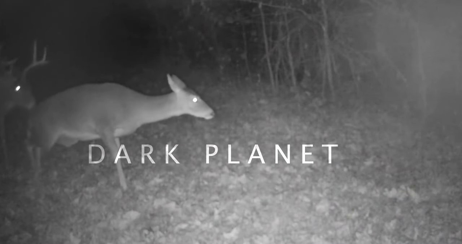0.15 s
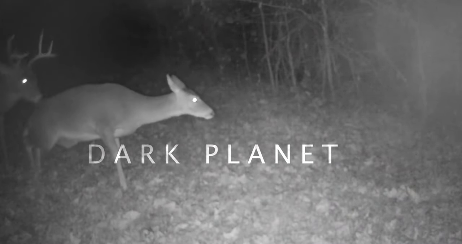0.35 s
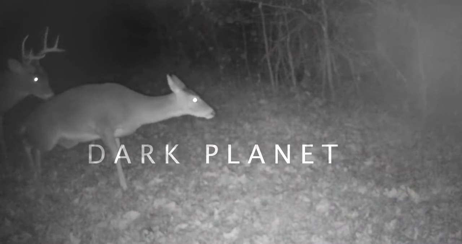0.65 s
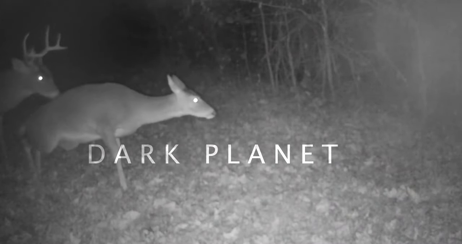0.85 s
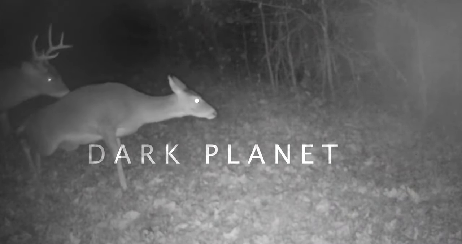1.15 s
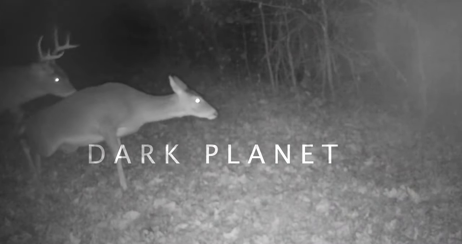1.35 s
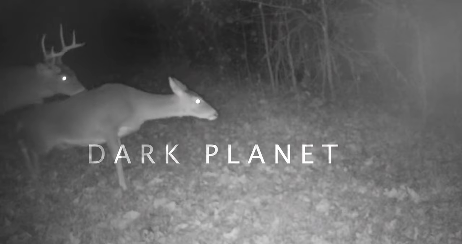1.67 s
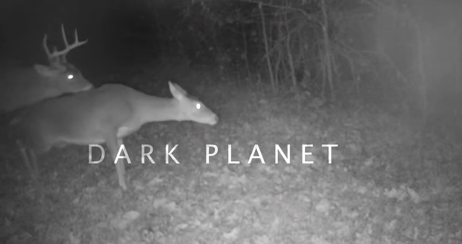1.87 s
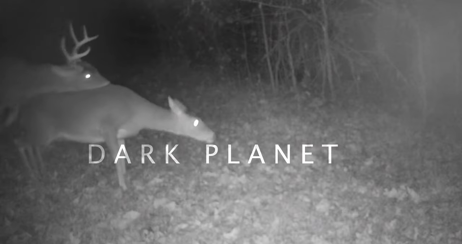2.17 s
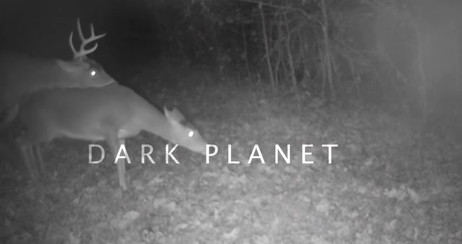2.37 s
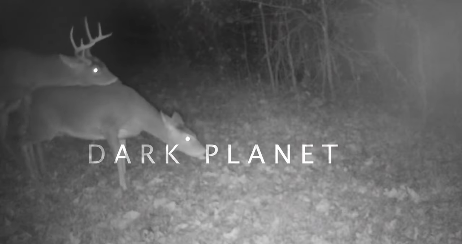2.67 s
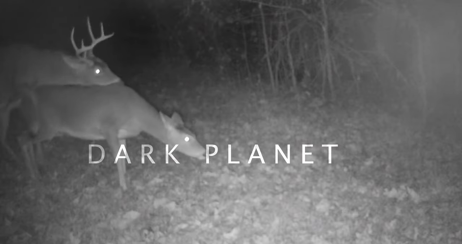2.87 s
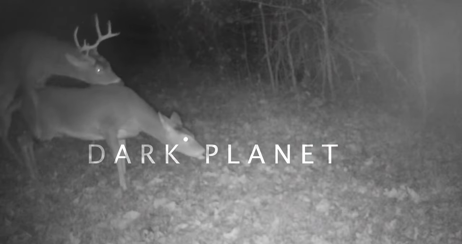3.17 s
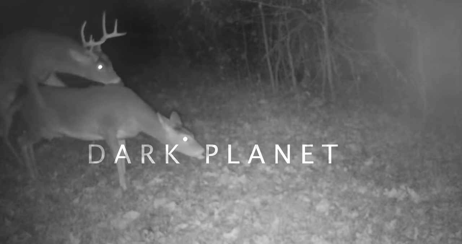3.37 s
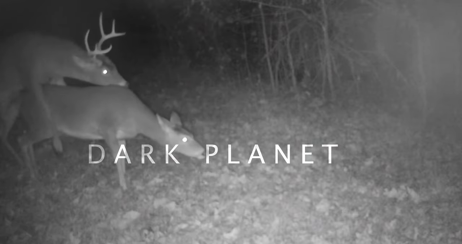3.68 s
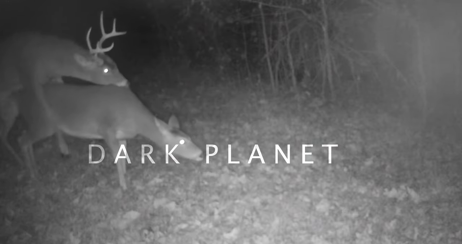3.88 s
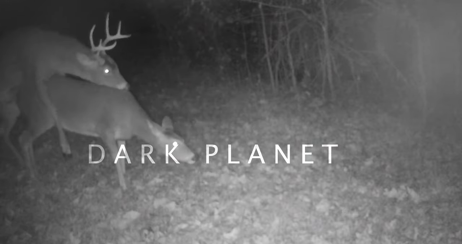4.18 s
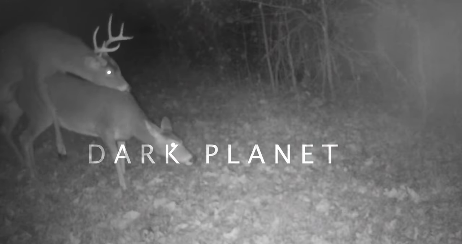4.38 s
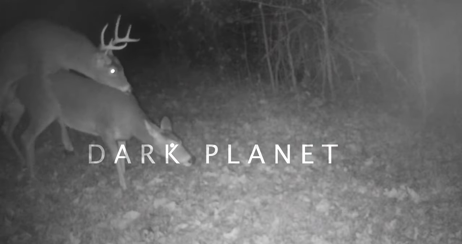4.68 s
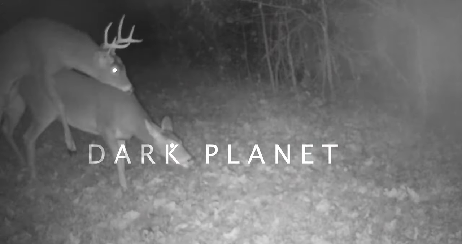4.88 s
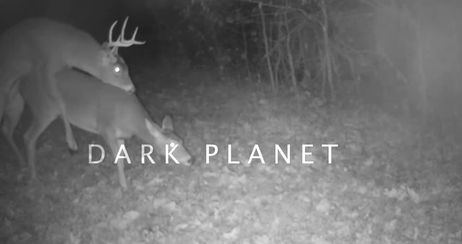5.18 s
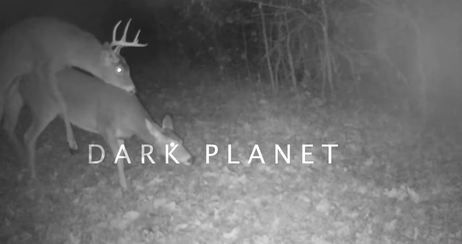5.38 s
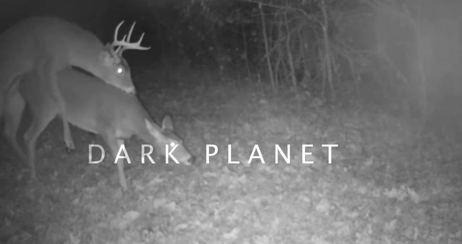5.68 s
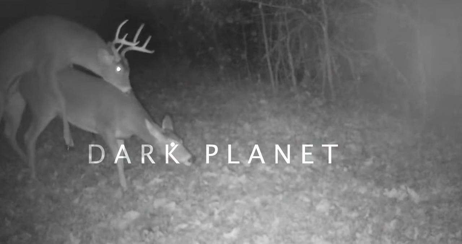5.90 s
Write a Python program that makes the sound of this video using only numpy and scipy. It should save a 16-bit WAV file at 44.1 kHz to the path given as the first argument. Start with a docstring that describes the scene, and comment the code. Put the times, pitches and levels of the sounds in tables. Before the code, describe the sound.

Two deer move through dry leaf litter in woods at night, a few metres from a small mono microphone. A crisp scuffle with several sharp stalk snaps fills the first 0.3 seconds, followed by softer, uneven rustling and small ticks. At about 2 seconds a hoof crunches down with a light thud and a snap, with a very faint, brief rising low note beneath it. Shuffling continues, with more snaps and another step between 2.6 and 2.9 seconds. From 3.3 seconds a dragging rustle swells into the loudest crunch and thud at 3.6, trailed by quick snaps. From 4 to 5.4 seconds there are only slight stirs and tiny cracks. A final scuffle with two steps follows, ending in a sharp snap at 5.8. The echo is short and weak. Faint hiss, low rumble and a thin, steady high electronic whine run throughout.

```python
"""Two deer shuffle through dry leaf litter at night, a few metres from a trail camera.
Dragged legs crackle the leaves, hooves crush them and thud, and stalks and twigs snap.
A faint low note rises under one footfall; trunks and ground return a short echo.
The camera's small housing rings near 4.5 kHz (the peak in the leaf spectra and stalk pitches);
its electronics add hiss, rumble and a thin whine."""
import sys
import numpy as np
from scipy import signal
from scipy.fft import rfft, irfft
from scipy.io import wavfile
from scipy.ndimage import uniform_filter1d, map_coordinates

SR = 44100
rng = np.random.default_rng(int(sys.argv[2]) if len(sys.argv) > 2 else 0)


def pcm_store(signal):
    """Save signal as 16-bit PCM."""
    levels = np.round(np.clip(np.atleast_2d(signal), -1, 1) * 32767)
    wavfile.write(sys.argv[1], SR, levels.astype(np.int16).T)


N = 266570
BAND_HZ, OUTPUT_HZ = 10250, 16000


def amp(db):
    """Decibels to gain."""
    return 10 ** (np.asarray(db) / 20)


def unit(x):
    """Scale to rms 1."""
    return x / np.sqrt(np.mean(x ** 2) + 1e-20)


def add(track, start_s, sound):
    """Mix a sound into the track."""
    part = track[max(round(start_s * SR), 0):][:len(sound)]
    part += sound[:len(part)]


def wobble(rate_hz):
    """Smooth curve through random knots."""
    knots = rng.standard_normal(int(N * rate_hz / SR) + 4)
    return map_coordinates(knots, [np.arange(N) * rate_hz / SR])


def resonate(x, hz, q):
    """Two-pole resonance."""
    return signal.lfilter(*signal.iirpeak(min(hz, BAND_HZ), max(q, .5), fs=SR), x)


def low_pass(x, hz):
    """Steep FIR low-pass."""
    return signal.fftconvolve(x, signal.firwin(401, hz, fs=SR), "same")


def coloured(x, spectrum, size=8192):
    """Minimum-phase filter through (freq_hz, gain_db) points."""
    freq_hz, gain_db = np.transpose(spectrum)
    bins_hz = np.fft.rfftfreq(size, 1 / SR)
    gain = amp(np.interp(np.log(bins_hz + 1), np.log(freq_hz), gain_db))
    cepstrum = irfft(np.log(gain))
    cepstrum[1:size // 2] *= 2
    cepstrum[size // 2 + 1:] = 0
    impulse = irfft(np.exp(rfft(cepstrum)))
    return signal.fftconvolve(x, impulse)[:len(x)]


# Camera noise floor: freq_hz, gain_db
HISS_SPECTRUM = [(15, -11), (36, 6), (60, -3.5), (120, -1), (180, -8.5), (400, -12.5), (800, -14.5),
                 (1500, -18), (3000, -20), (4500, -23.5), (6500, -23.5), (10000, -24)]


def electronics():
    """The camera's own hiss and rumble, with a steady thin whine."""
    hiss_db, whine_db, whine_hz = -36.5, -42.5, 5223.4
    hiss = amp(hiss_db) * unit(coloured(rng.standard_normal(N), HISS_SPECTRUM))
    phase = 2 * np.pi * np.cumsum(whine_hz + .66 * wobble(rate_hz=3.87)) / SR
    whine = amp(whine_db + .3 * wobble(rate_hz=7.4)) * unit(np.sin(phase))
    return hiss + whine


def woods(x, t60_s=.14, echo_db=-15.5):
    """Trunks and ground scatter a short, weak echo."""
    t = np.arange(SR // 2) / SR
    tail = rng.standard_normal(len(t)) * amp(-60 * t / t60_s)
    return x + amp(echo_db) * signal.fftconvolve(x, tail / np.linalg.norm(tail))[:N]


def low_note():
    """A faint low note swells, rises and fades; perhaps a deer's soft call."""
    start_s, length_s, level_db = 1.98, .145, -46.5
    pitch_hz, rise_hz_per_s = 241, 265
    t, out = np.arange(int(length_s * SR)) / SR, np.zeros(N)
    phase = 2 * np.pi * np.cumsum(pitch_hz + rise_hz_per_s * t) / SR
    swell = np.sin(np.pi * t / length_s)
    add(out, start_s, amp(level_db) * unit(swell * np.sin(phase)))
    return out


def snap(pitch_hz, q, crack_share, splinter, t60_s, tear_s, echo_s):
    """One break: fibres tear, splinter on and reflect, giving a broad crack and a ring."""
    t = np.arange(SR // 20) / SR
    envelope = np.exp(-t / tear_s) + splinter * amp(-60 * t / t60_s)
    force = rng.standard_normal(len(t)) * envelope
    delay = int(echo_s * SR * amp(rng.normal(0, 2)))
    force = force + .29 * np.pad(force, (delay, 0))[:len(t)]
    crack = resonate(force, pitch_hz, q=1)
    ring = resonate(resonate(crack, pitch_hz, q), pitch_hz, q)
    band_limit = signal.butter(6, .95 * BAND_HZ, fs=SR, output="sos")
    sound = signal.sosfilt(band_limit, ring + crack_share * crack)
    return sound / np.sqrt(np.sum(sound ** 2) / (.002 * SR))  # energy of 2 ms at rms 1


# Leaf stalks breaking: start_s, level_db, pitch_hz, crack_share
STALK_SNAPS = [(0.054, -16.5, 3500, 0.41), (0.0794, -6, 4900, 0.77), (0.129, -14.0, 3660, 0.4),
               (0.2002, -12, 4400, 0.45), (0.2286, -11.5, 4500, 0.3), (0.3826, -23, 4105, 0.53),
               (0.7762, -30, 3913, 0.2), (0.9785, -17, 4543, 0.34), (1.059, -19.5, 4170, 0.15),
               (1.87, -25, 4150, 0.54), (2.0702, -9, 4840, 1.2), (2.6034, -9, 4380, 0.29),
               (3.428, -12, 4398, 0.65), (3.543, -8.5, 4394, 0.15), (3.773, -13.5, 4333, 1.16),
               (3.8082, -19, 4095, 0.32), (3.8517, -20.5, 4163, 0.72), (3.8948, -16.5, 4170, 1.2),
               (4.374, -27, 4920, 0.82), (4.412, -29, 3780, 0.27), (5.085, -31, 4460, 0.24),
               (5.1535, -28, 4370, 0.22), (5.825, -12, 4594, 0.59)]
# Twigs cracking under the litter: start_s, level_db, pitch_hz, q
TWIG_CRACKS = [(0.4417, -20, 2600, 0.5), (0.533, -29.5, 2000, .55), (1.828, -27.5, 1500, .55),
               (2.605, -27, 1498, .6), (2.8137, -20, 2800, .7), (2.861, -19, 1450, .55),
               (4.062, -30, 2600, .55), (4.278, -32.5, 800, .55), (4.749, -32.5, 2970, .7),
               (5.825, -14.5, 2700, 3)]


def breaks(onset_delay_s=.0008):
    """Stalks snap brightly; buried twigs give a lower, broader crack."""
    out = np.zeros(N)
    for start_s, level_db, pitch_hz, crack_share in STALK_SNAPS:
        stalk = snap(pitch_hz, q=2, crack_share=crack_share, splinter=.27,
                     t60_s=.029, tear_s=.00045, echo_s=.00118)
        add(out, start_s + onset_delay_s, amp(level_db) * stalk)
    for start_s, level_db, pitch_hz, q in TWIG_CRACKS:
        twig = snap(pitch_hz, q, crack_share=1.9, splinter=.19, t60_s=.028, tear_s=.00043, echo_s=.00134)
        add(out, start_s + onset_delay_s, amp(level_db) * twig)
    return out


def crackle(spectrum, rate_per_s, spread_db, clump_db, clump_hz):
    """Tiny leaf fractures at random moments: many weak, few strong, in clumps."""
    per_sample = rate_per_s / SR
    clicks = np.sqrt(rng.poisson(per_sample, N) / per_sample) * rng.choice([-1, 1], N)
    clicks *= amp(spread_db * np.clip(rng.standard_normal(N), -2, 2))
    clumps = amp(clump_db * wobble(clump_hz))
    return unit(coloured(clicks * clumps, spectrum))


# Leaves crushed underfoot: freq_hz, gain_db
CRUSH_SPECTRUM = [(80, -31), (260, -15.5), (700, -12.5), (1100, -12.5), (1800, -3.5), (2600, -7), (3900, 2),
                  (4800, -1.5), (6500, -8.5), (9800, -15), (12000, -38)]
# Hooves taking weight: peak_s, crunch_db, rise_s, hold_s, t60_s, thud_db, thud_hz
FOOTFALLS = [(0.095, -25, 0.0072, 0.036, 0.12, -35.5, 1100), (2.021, -25, 0.0024, 0.013, 0.14, -22, 1900),
             (2.045, -18.5, 0.003, 0.032, 0.057, -32, 1500), (2.706, -20.5, .0015, 0.018, 0.043, -28, 1120),
             (3.62, -8, 0.01, 0.0049, 0.13, -18, 919.8), (3.689, -16, .004, 0.0079, 0.044, -26.5, 497),
             (5.652, -27, 0.0055, 0.017, .05, -24.5, 1799), (5.733, -18, 0.0049, .02, 0.077, -34, 1500)]


def hooves():
    """A hoof crushes many leaves at once and thuds on the ground as its weight comes down."""
    t, out = np.arange(N) / SR, np.zeros(N)
    crunch = crackle(CRUSH_SPECTRUM, rate_per_s=12000, spread_db=7.5, clump_db=-4, clump_hz=220)
    for peak_s, crunch_db, rise_s, hold_s, t60_s, thud_db, thud_hz in FOOTFALLS:
        rise = np.exp(np.minimum(t - peak_s, 0) / rise_s)
        decay = amp(-60 * np.maximum(t - peak_s - hold_s, 0) / t60_s)
        ground = resonate(rng.standard_normal(N), thud_hz, q=2)
        thud = unit(resonate(ground, thud_hz, q=.9))
        out += rise * decay * (amp(crunch_db) * crunch + amp(thud_db) * thud)
    return out


def patchy(x, depth_db):
    """Each leaf has its own colour, so the timbre shifts from moment to moment."""
    frames = signal.stft(x, nperseg=256)[2]
    patches = uniform_filter1d(rng.standard_normal(frames.shape), size=5, axis=0)
    patches = unit(uniform_filter1d(patches, size=4, axis=1))
    return unit(signal.istft(frames * amp(depth_db * patches), nperseg=256)[1][:N])


# Legs dragging through the litter: start_s, swell_s, hold_s, top_db, packed_db
LEG_DRAGS = [(-.042, .05, 0.069, -23.5, -35.5), (.022, .056, 0.056, -19, -28.5),
             (.176, .039, 0.064, -28.5, -36), (.27, .035, 0.06, -35.5, -43.5),
             (.427, .026, 0.064, -38.5, -46), (.833, .08, 0.3, -31, -40.5), (.95, .025, 0.049, -29.5, -35),
             (1.251, .052, 0.098, -40, -51), (1.404, .07, .037, -32, -39.5), (1.546, .054, .13, -36, -45.5),
             (1.767, .087, .16, -35, -40.5), (1.928, .029, .062, -33, -43), (2.017, .023, .033, -19, -26),
             (2.105, .025, .219, -31, -36.5), (2.336, .05, .13, -29, -37), (2.558, .04, 0.067, -29.5, -34),
             (2.702, .027, 0.065, -24, -28), (2.85, .043, 0.16, -27, -37), (3.307, .112, 0.13, -20, -29.5),
             (3.565, .032, .047, -14, -22), (3.666, .021, 0.084, -25, -29.5),
             (3.865, .023, 0.021, -34, -42), (4.251, .028, .025, -41.5, -46.5),
             (4.371, .032, .03, -44, -52), (4.886, .046, .03, -43.5, -46), (5.457, .1, .066, -26, -29),
             (5.584, .046, .04, -19, -29.5), (5.678, .038, .033, -22, -33),
             (5.824, .045, 0.05, -37.5, -38.5)]


def drag_levels_db():
    """Top and packed layer levels: each drag swells, holds and stops, then its leaves settle."""
    stir_top_db, stir_packed_db = -46, -61  # standing deer never leave the litter quite still
    release_db_per_s, settle_db, settle_db_per_s = 125, -14.5, 33
    t = np.arange(N) / SR
    power = np.ones(N) * amp([[stir_top_db], [stir_packed_db]]) ** 2
    for start_s, swell_s, hold_s, top_db, packed_db in LEG_DRAGS:
        push = np.clip((t - start_s) / swell_s, 0, 1)
        after_s = np.maximum(t - start_s - swell_s - hold_s, 0)
        fall_db = np.maximum(-release_db_per_s * after_s, settle_db - settle_db_per_s * after_s)
        power += (amp([[top_db], [packed_db]]) * push * amp(fall_db)) ** 2
    return 10 * np.log10(power)


# Crisp top leaves: freq_hz, gain_db
TOP_SPECTRUM = [(200, -39), (1000, -14.5), (2000, -14.5), (2800, -8), (3700, -3.5), (4600, -1.5),
                (5400, -5), (6500, -11.5), (8500, -14), (10000, -19.5), (12000, -56)]
# Packed layer beneath: freq_hz, gain_db
PACKED_SPECTRUM = [(60, -16.5), (250, -7.5), (500, -1.5), (780, -7.5), (1250, .5), (1800, 0), (2400, -1),
                   (4000, -4), (7000, -29), (12000, -33)]


def rustle():
    """Moving legs stir the crisp top leaves and grind the duller layer beneath."""
    top_db, packed_db = drag_levels_db()
    effort = amp(.75 * (top_db - top_db.max()))  # harder movement breaks more leaves
    top = crackle(TOP_SPECTRUM, rate_per_s=20000 * effort, spread_db=2.5, clump_db=1.35, clump_hz=150)
    packed = crackle(PACKED_SPECTRUM, rate_per_s=9000 * effort, spread_db=2, clump_db=2.5, clump_hz=89)
    return amp(top_db) * patchy(top, depth_db=1.07) + amp(packed_db) * patchy(packed, depth_db=2.3)


def scene():
    """Deer among the trees, over the camera's noise; mono."""
    deer = rustle() + hooves() + breaks() + low_note()
    return (woods(deer) + electronics())[None]


def record(dry):
    """Narrow-band recorder; peaks clip at full scale."""
    clipped = np.clip(low_pass(dry[0], BAND_HZ), -1, 1)
    return low_pass(clipped, OUTPUT_HZ)[None]


dry = scene()
out = record(dry)
pcm_store(out)
```